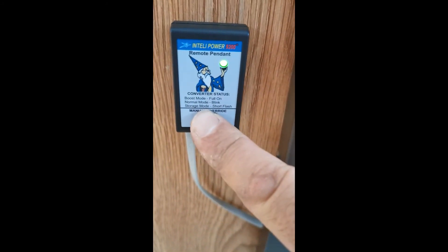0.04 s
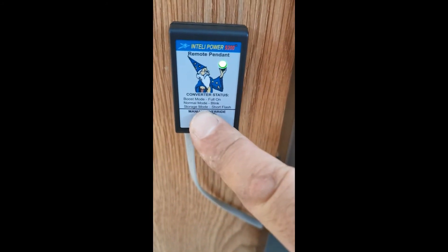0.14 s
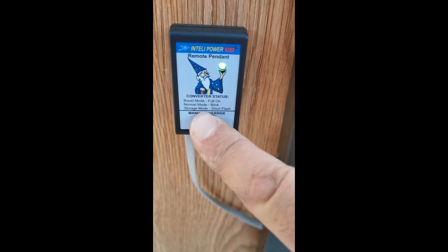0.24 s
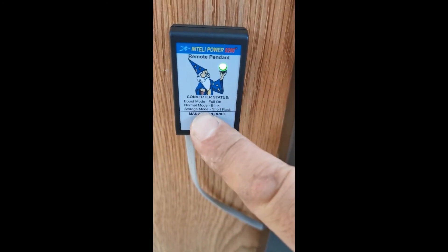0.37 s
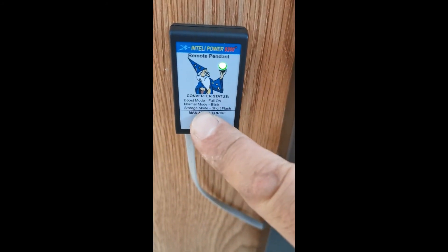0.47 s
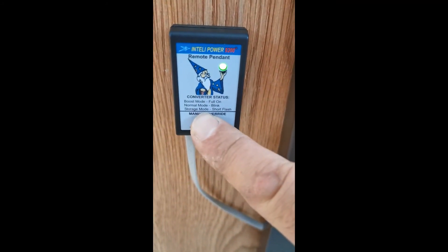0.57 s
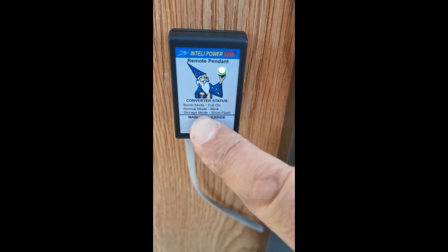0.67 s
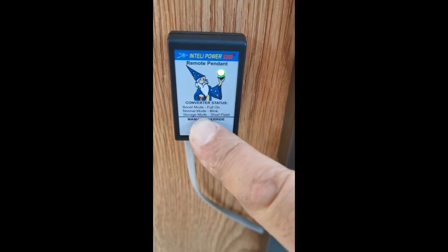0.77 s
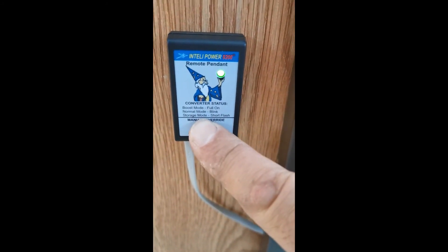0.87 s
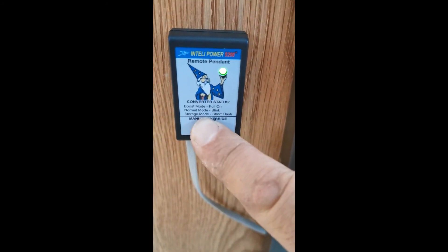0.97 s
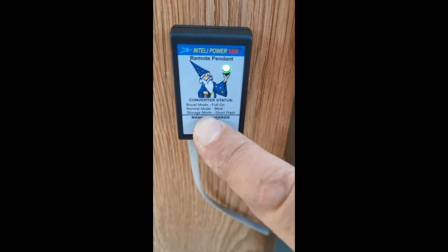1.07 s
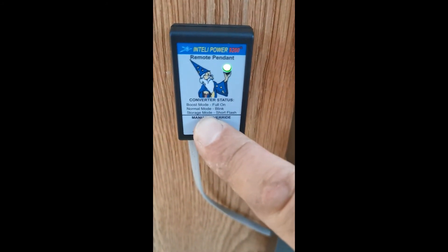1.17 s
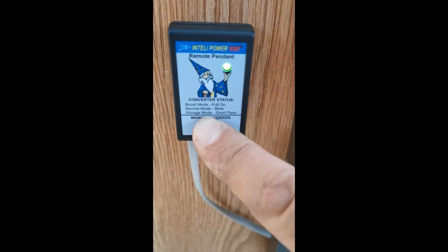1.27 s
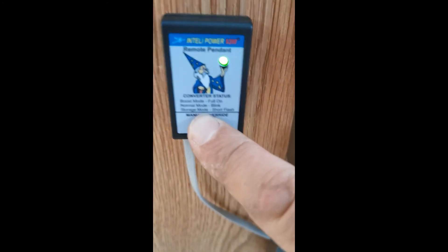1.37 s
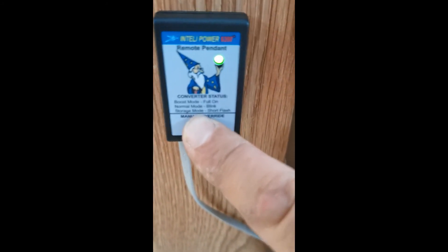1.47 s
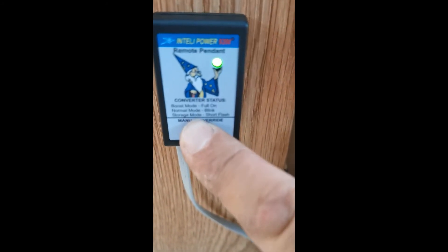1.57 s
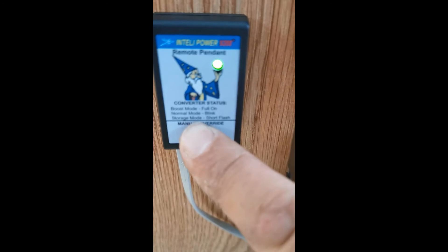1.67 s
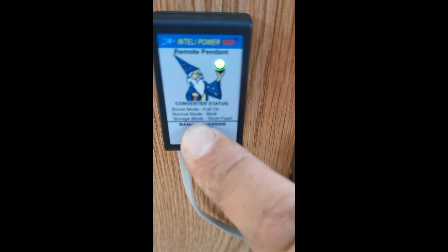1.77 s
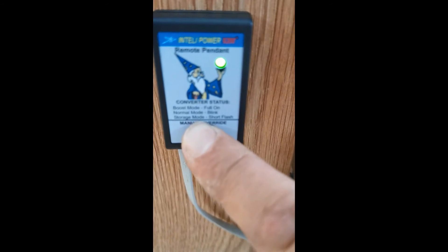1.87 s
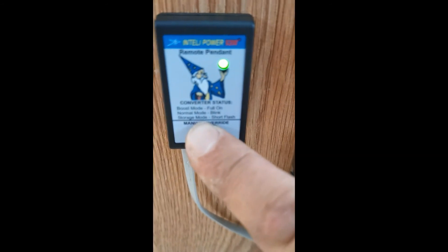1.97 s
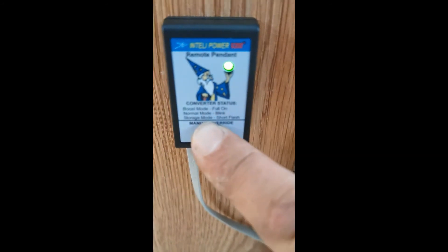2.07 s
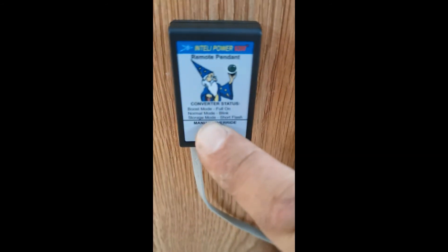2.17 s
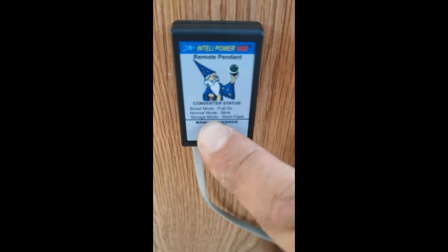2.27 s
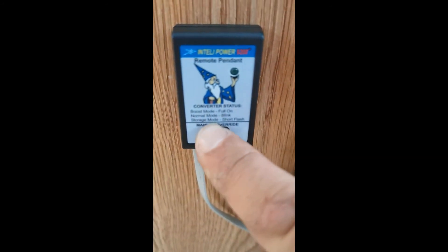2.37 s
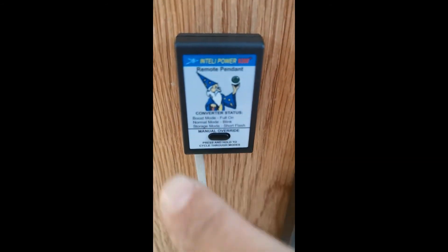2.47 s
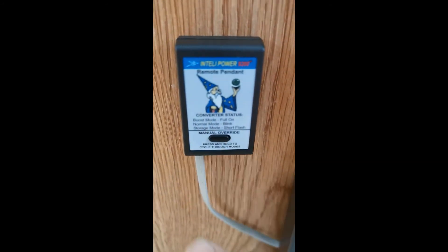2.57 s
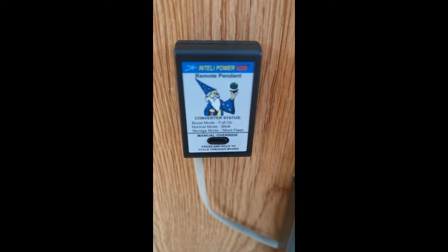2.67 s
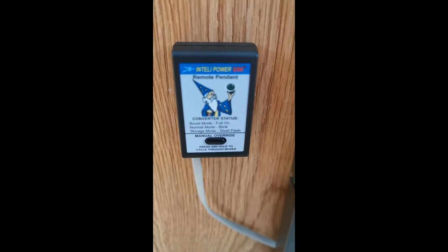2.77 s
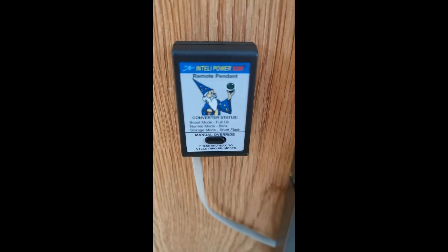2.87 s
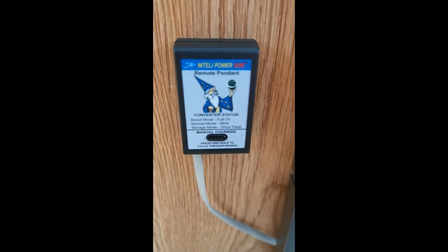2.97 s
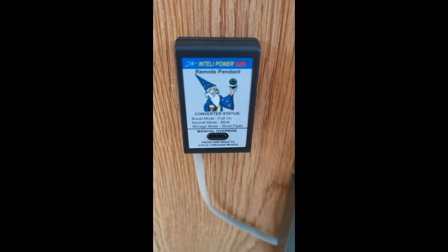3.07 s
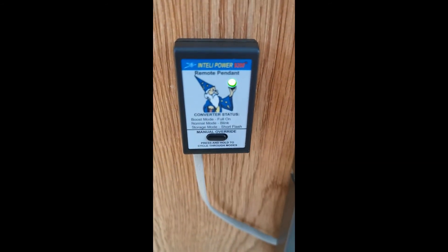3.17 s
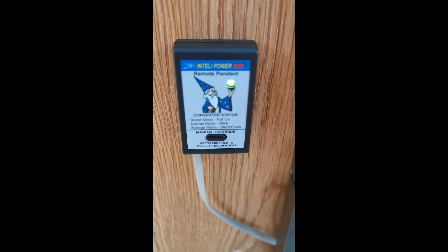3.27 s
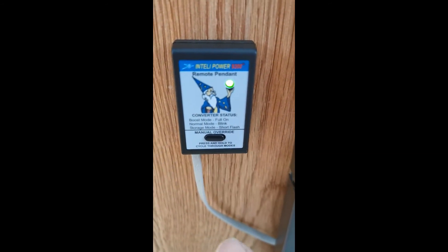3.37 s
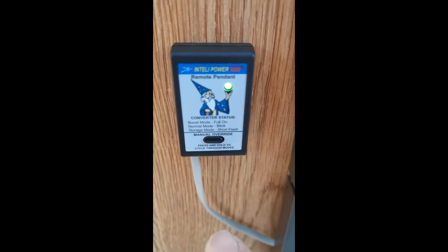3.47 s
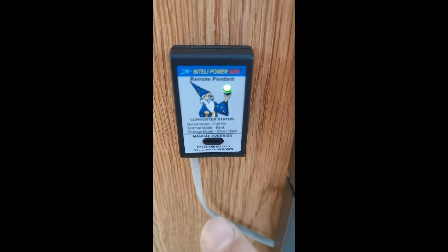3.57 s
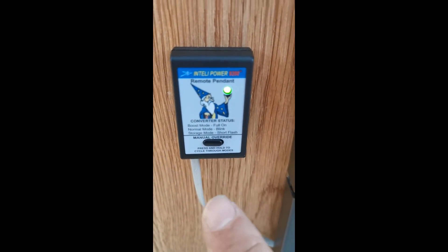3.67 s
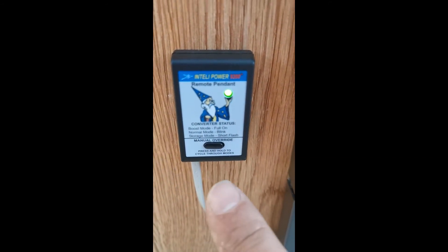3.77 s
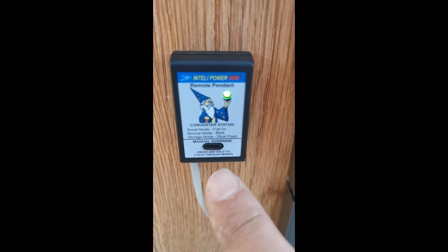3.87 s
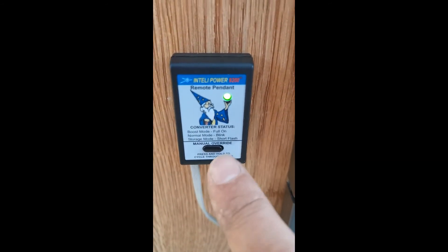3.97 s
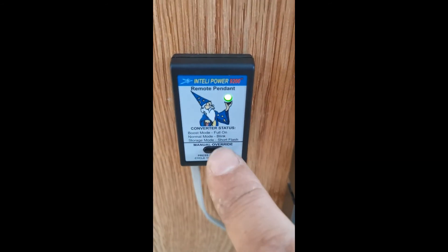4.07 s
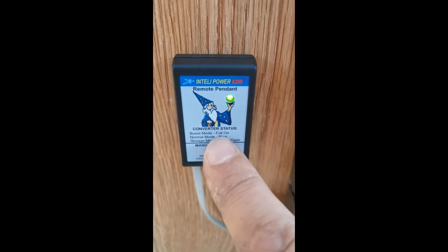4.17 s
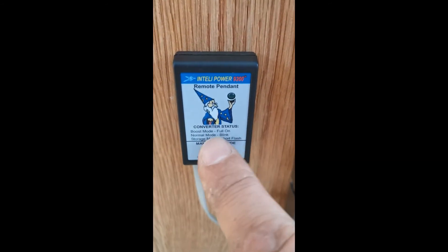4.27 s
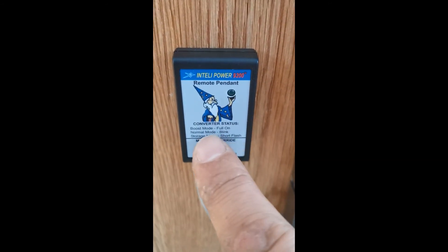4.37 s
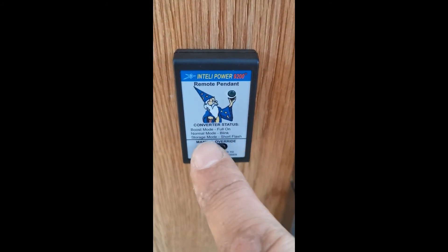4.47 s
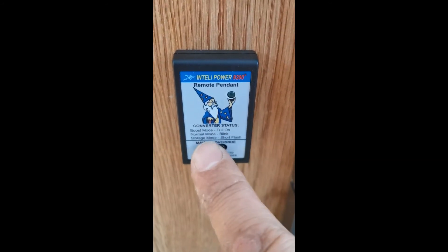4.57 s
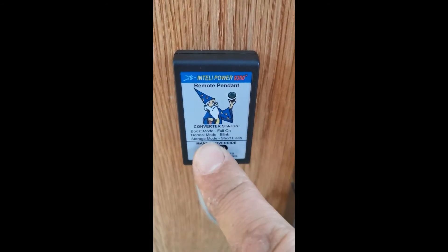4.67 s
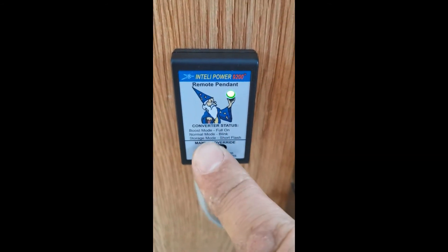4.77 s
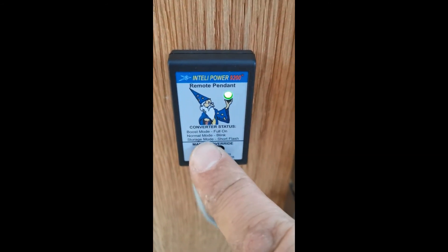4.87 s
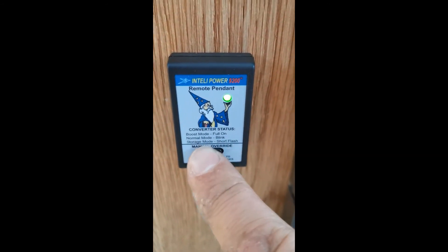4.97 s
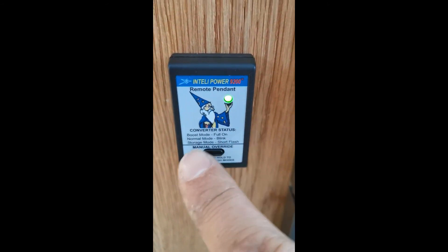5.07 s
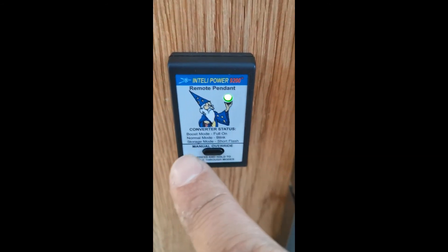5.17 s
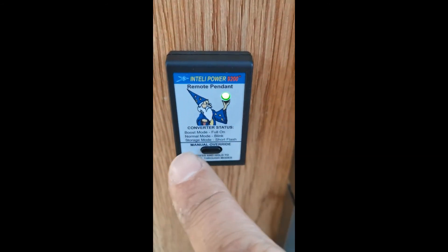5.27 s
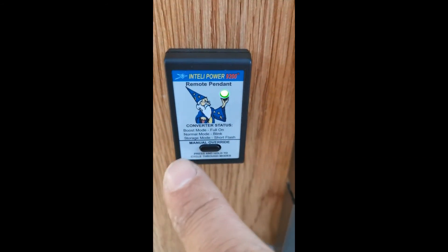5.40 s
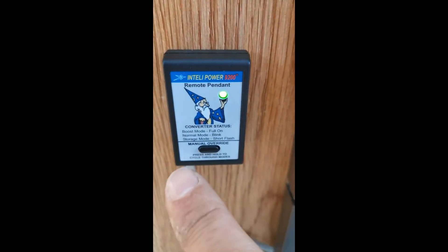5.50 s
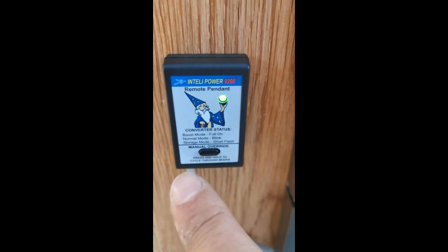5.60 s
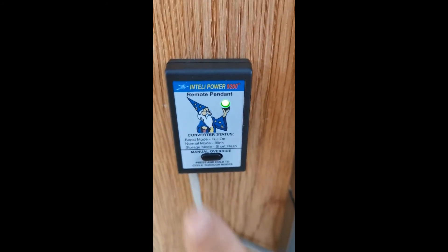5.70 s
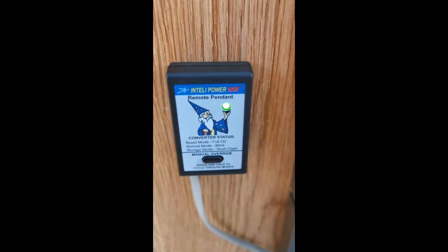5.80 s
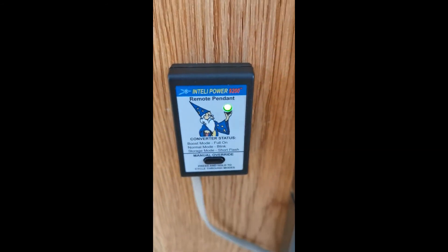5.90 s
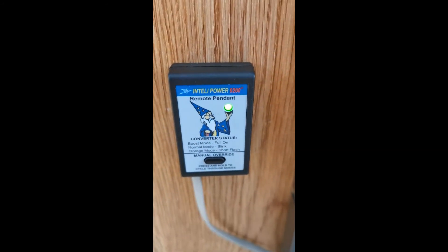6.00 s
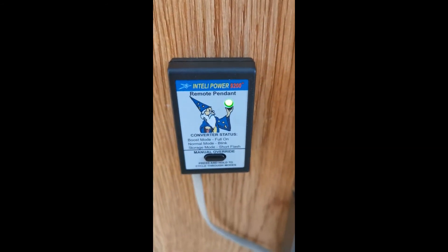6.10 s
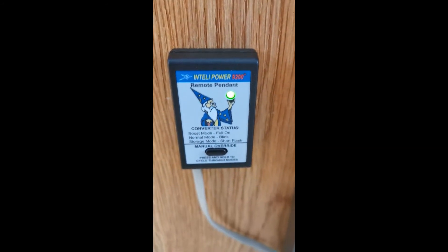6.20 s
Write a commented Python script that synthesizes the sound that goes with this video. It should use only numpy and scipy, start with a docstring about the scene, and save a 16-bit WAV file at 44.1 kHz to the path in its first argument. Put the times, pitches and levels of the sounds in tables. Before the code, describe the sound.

Close, dry stereo pickup in a small quiet room. Low airy rumble, faint hiss and an unsteady low hum run throughout, with barely audible insect chirps and trill. At about two and a half seconds a button releases with a crisp plastic snap and small ticks; later come a soft nail tap, a bright hard press click and another sharp snap as the finger slips off, then quiet.

```python
"""Push button on a wooden panel

A finger works the push button of a small plastic control box on a wooden wall panel, in a small quiet room.
Each snap is a noisy crack and the ringing modes of the case, over the thump of the panel and a short room
tail; the finger's lighter ticks are the same blow, softer and damped. Behind it lie shaped noise for air,
rumble, hiss and a low hum, with the faint chirps and pulsed trill of insects outside."""
import sys
import numpy as np
from scipy import signal
from scipy.fft import rfft, irfft
from scipy.io import wavfile

SR = 44100
rng = np.random.default_rng(int(sys.argv[2]) if len(sys.argv) > 2 else 0)


def unload_audio(sound):
    """Save the sound as a 16-bit wav file, at the path given as the first command line argument."""
    columns = np.transpose(np.atleast_2d(sound))
    # keep every value between -1 and 1, then stretch to whole-number steps
    steps = np.round(np.clip(columns, -1, 1) * 32767)
    wavfile.write(sys.argv[1], SR, steps.astype(np.int16))


N = 275266  # length [samples]

# Left-right pan is left minus right; the spectra of noises and modes are relative levels.
# room air spectrum: (frequency [Hz], level [dB per Hz])
AIR_SPECTRUM = [(12, -31), (20, 3.5), (38, -3.5), (58, -5.5), (75, -4), (90, -9.5), (135, -5.5),
                (156, -12.5), (205, -8), (253, -17), (484, -21), (752, -23.5), (927, -22.5), (1810, -42.5),
                (3000, -43), (3900, -68.5), (6600, -120)]
# hiss spectrum: (frequency [Hz], level [dB per Hz])
HISS_SPECTRUM = [(2200, -6.5), (3000, -6.5), (4000, -4), (5000, -1.5), (5800, -3), (6250, -9.5),
                 (9000, -14), (12000, -11.5), (15500, -15)]
# how alike the background is on both sides: (frequency [Hz], likeness [0 to 1])
SIDE_LIKENESS = [(30, 0.54), (80, 0.89), (150, 0.92), (380, 0.34), (950, 0.019), (15000, 0.1)]
# one more gentle swell of air and hiss: (middle [s], half length [s], lift [dB])
LATE_SWELL = (5.7, 0.51, 1.8)
# hands shifting, which lifts air and hiss, brushes softly and bumps the deep bass:
# (middle [s], half length [s], lift [dB], brush [dB], bump [dB])
HAND_MOVES = [(.3, 0.14, 1, -79, 2.5), (5.31, 0.081, 0, -90.5, 9)]
# bouts of evenly paced insect chirps: (first chirp [s], last chirp [s])
CHIRP_BOUTS = [(.33, 1.05), (1.485, 2.185), (2.58, 4.57), (5.205, 5.595), (6.115, 6.115)]
# room decay: (frequency [Hz], t60 [s])
ROOM_DECAY = [(150, 0.11), (600, 0.1328), (2000, 0.1245), (5000, 0.18), (8000, 0.1559), (15000, 0.24)]
# how strongly the room answers: (frequency [Hz], level [dB])
ROOM_TONE = [(150, -7), (350, 5), (700, 3.5), (2000, 1.5), (3200, 5.5), (5000, -3), (8000, -3.5),
             (15000, -11.5)]
# wooden panel with the box on it, broad knocks and longer rings, before any damping by the finger:
# (frequency [Hz], level [dB], t60 [s], left-right pan [dB], first swing [+1 or -1])
PANEL_MODES = [(201.9, -3, 0.15, -1, 1), (216.5, -11.5, 0.35, -1.5, 1), (284, -1, 0.022, 6, 1),
               (326, -13, 0.11, -5.5, 1), (343.3, -8, .11, 11.5, -1), (559, -19, 0.2, -6, -1),
               (570, 8.5, 0.0057, -9.5, -1), (600, -23, 0.19, -3.5, -1), (693, -17.5, 0.086, -5.5, 1),
               (772, -28, 0.1, -9, -1), (898, -25, 0.2, 9.5, -1), (1094, -15.5, 0.032, 0, -1),
               (1040, 5, 0.0041, 15.5, 1), (1065, -8, .04, -11, 1), (1327, -11, 0.026, -24, -1),
               (1580, -21, 0.058, 13, 1)]
# plastic case and switch dome:
# (frequency [Hz], level [dB], t60 [s], left-right pan [dB], first swing [+1 or -1])
CASE_MODES = [(2600, -9, .016, -2, 1), (3100, -6.5, .018, 0, -1), (3440, -6, .02, -2, 1),
              (4300, -1, .018, 4, -1), (4680, -1.5, .015, 4, 1), (5280, -.5, .015, 2, -1),
              (6500, -4, .012, -2, 1), (7050, -6, .012, -3, -1), (7650, -3, .013, -5, 1),
              (8200, -6, .012, -5, -1), (8700, -4, .012, -5, 1), (9450, -7, .01, -4, -1),
              (10900, -10, .009, -4, 1), (12900, -18, .008, -4, -1)]
# crack of contact: (frequency [Hz], level [dB])
CRACK_SPECTRUM = [(200, -13), (1000, -4), (2000, -1), (3200, -4), (4800, -1), (6000, -2.5), (8200, -7.5),
                  (11000, -11.5), (13500, -16.5), (16000, -22)]
# how each way of striking the plastic weights the snap: (frequency [Hz], level [dB])
# clean release of the button
RELEASE_WEIGHTS = [(1400, 2), (2000, -5), (2600, -2.5), (3500, -1.5), (4100, -2.5), (5000, -0.5),
                   (6000, -4), (7600, -3), (8500, -9.5), (9400, 0.5), (11500, 1), (15000, -7)]
# finger slipping off: (frequency [Hz], level [dB])
SLIP_WEIGHTS = [(1400, 7.5), (2200, -0.5), (3500, -3.5), (4400, 1.5), (5700, 0), (6500, 6), (7600, -7.5),
                (9200, 3.5), (11000, -6), (15000, -10)]
# press: (frequency [Hz], level [dB])
PRESS_WEIGHTS = [(1300, -0.5), (2100, -6), (3000, -1), (3600, -2.5), (4400, 0.5), (5200, -3.5),
                 (6200, -9.5), (7300, 5), (8700, 2.5), (9600, -9), (11000, -7), (12500, -8), (15500, -14.5)]
# fingernail: (frequency [Hz], level [dB])
NAIL_WEIGHTS = [(1300, 3), (2700, -4), (3600, -9), (4400, -2.5), (5000, 5.5), (6000, 9), (8500, 9.5),
                (11000, 14.5), (13000, 18), (15000, 10)]
# switch snaps and the tap of the finger landing:
# (time [s], snap [dB], thump [dB], treble tilt [dB/octave], way of striking [name],
#  panel damping by the finger [1/s, below 0 counts as 0], hardness [dB/octave], room [dB])
SWITCH_CLICKS = [(2.4767, -30, -24.5, -0.5, "release", 7.5, -2, -8.5),
                 (4.2347, -41, -49, -2, "nail", -1.5, -2.5, -3.5),
                 (4.6765, -27, -28.5, 2, "press", 33.5, -2, -11),
                 (5.0198, -30.5, -29, 6, "slip", 4.5, -2, -9.5)]
# light ticks of fingertip and loose button:
# (time [s], snap [dB], thump [dB], treble tilt [dB/octave])
LIGHT_TICKS = [(2.44, -87.5, -60.5, -9), (2.4977, -47.5, -56, -2), (2.506, -50, -42.5, -3),
               (2.546, -57, -73, 1.5), (2.5684, -66.5, -81, -1), (3.2650, -69.5, -86, 6),
               (4.2280, -63, -55.5, -12), (4.4403, -72, -55.5, 3), (4.4786, -56.5, -66, 4),
               (4.55, -67, -76, -0.5), (4.9789, -67.5, -73, 7.5), (5.0859, -48.5, -49, -5.5),
               (5.25, -68.5, -72.5, -13.5)]

AIR_DB, HISS_DB = -65, -82  # rms before settling and lifts
AIR_SETTLE_DB, HISS_SETTLE_DB, SETTLE_S = 5.5, 5, 0.51  # extra level at the start, and how fast it dies
RUMBLE_DB = 2.5  # lift of the deepest bass above the rest of the air
HUM_DB = -71.5  # resting level
HUM_SWELL_S, HUM_SWELL_HALF_S, HUM_SWELL_DB = 1.7, 1.3, 6.3
CHIRP_EVERY_S, CHIRP_DB = .38, -85.5
TRILL_DB, TRILL_FADE_DB_PER_S = -84, 2.5  # level at the start, then a steady fade
TRILL_RETURN_S, TRILL_RISE_DB_PER_S = 4, 2
LEFT_LATE_S = .00003  # the right side hears each blow first
EDGE_HZ = 15900


def amp(db):
    """Decibels to gain."""
    return 10 ** (np.asarray(db) / 20)


def evened(x):
    """Scales a sound to an overall rms of 1."""
    return x / np.sqrt(np.mean(x ** 2) + 1e-20)


def read(points, hz):
    """Reads a curve along a log-frequency axis."""
    f, value = np.transpose(points)
    return np.interp(np.log(hz + 1), np.log(f), value)


def add(mix, s, sound):
    """Mixes a stereo sound in at time s."""
    part = mix[:, round(s * SR):][:, :sound.shape[1]]
    part += sound[:, :part.shape[1]]


def swell(middle_s, half_s):
    """A flat-topped rise and fall from 0 to 1 and back."""
    t = np.arange(N) / SR
    return np.exp(-((t - middle_s) / half_s) ** 4)


def narrow_noise(hz, width_hz):
    """A fuzzy stereo tone: noise under a bell-shaped band, at an overall rms of 1."""
    f = np.fft.rfftfreq(N, 1 / SR)
    band = np.exp(-((f - hz) / width_hz) ** 2)
    return evened(irfft(rfft(rng.standard_normal((2, N))) * band, N))


def colour(x, db_at, size=32768):
    """Causal minimum-phase filter with the gain db_at(Hz), so that attacks stay sharp."""
    log_gain = np.log(amp(db_at(abs(np.fft.fftfreq(size, 1 / SR)))))
    response = np.exp(np.conj(signal.hilbert(log_gain)))[:size // 2 + 1]
    return irfft(rfft(x, size) * response)[:, :x.shape[1]]


def background():
    """Air, rumble and hiss as shaped noise, most alike on both sides around 80 to 150 Hz; it settles and lifts."""
    hz = np.fft.rfftfreq(N, 1 / SR)
    settling = np.exp(-np.arange(N) / SR / SETTLE_S)
    late_s, late_half_s, late_db = LATE_SWELL
    lift_db = late_db * swell(late_s, late_half_s)
    lift_db = lift_db + sum(db * swell(s, half_s) for s, half_s, db, _, _ in HAND_MOVES)
    bump_db = sum(db * swell(s, half_s) for s, half_s, _, _, db in HAND_MOVES)
    # the right side shares part of the left side's noise
    left, other = rfft(rng.standard_normal((2, N)))
    same = np.clip(read(SIDE_LIKENESS, hz), 0, 1)
    noise = np.array([left, same * left + np.sqrt(1 - same ** 2) * other])
    air = amp(AIR_DB) * evened(irfft(noise * amp(read(AIR_SPECTRUM, hz)), N))
    deep = signal.sosfiltfilt(signal.butter(2, 55, fs=SR, output="sos"), air)
    hiss = amp(HISS_DB) * evened(irfft(noise * amp(read(HISS_SPECTRUM, hz)), N))
    wash = (air - deep) * amp(AIR_SETTLE_DB * settling)
    wash += hiss * amp(HISS_SETTLE_DB * settling)
    return wash * amp(lift_db) + deep * amp(RUMBLE_DB + bump_db)


def hum():
    """A low, unsteady machine hum: one narrow noise band, alike on both sides, swelling once."""
    tone = narrow_noise(hz=87, width_hz=14)[0]
    return amp(HUM_DB + HUM_SWELL_DB * swell(HUM_SWELL_S, HUM_SWELL_HALF_S)) * tone


def trill(strokes_per_s=67.3, groups_per_s=10.6, top_hz=6020, fall_hz=520):
    """A far cricket: quick wing strokes in gently pulsing groups, each stroke falling in pitch."""
    t = np.arange(N) / SR
    # the stroke rate and the pitch both waver a little
    stroke = (strokes_per_s * t + 0.024 * narrow_noise(0, width_hz=5.0)[0]) % 1
    pitch_hz = top_hz - fall_hz * stroke + 110 * narrow_noise(0, width_hz=220)
    tone = np.sin(2 * np.pi * np.cumsum(pitch_hz, 1) / SR)
    groups = 1 + 0.15 * np.sin(2 * np.pi * groups_per_s * t)
    pulsing = np.sin(np.pi * stroke) ** 4 * groups
    fade_db = TRILL_FADE_DB_PER_S * np.minimum(t, TRILL_RETURN_S)
    rise_db = TRILL_RISE_DB_PER_S * np.maximum(t - TRILL_RETURN_S, 0)
    return amp(TRILL_DB - fade_db + rise_db) * evened(tone * pulsing)


def chirping(half_s=.05):
    """An insect's chirps: short soft swells of a thin high band, evenly spaced within each bout."""
    bouts = []
    for first, last in CHIRP_BOUTS:
        count = 1 + round(abs(last - first) / CHIRP_EVERY_S)
        bouts.append(np.linspace(first, last, count))
    swells = sum(swell(s, half_s) for s in np.concatenate(bouts))
    return amp(CHIRP_DB) * swells * narrow_noise(hz=7780, width_hz=310)


def rustle():
    """The soft brush of the moving hand: a mid noise band that swells with each shift."""
    brushes = sum(amp(db) * swell(s, half_s) for s, half_s, _, db, _ in HAND_MOVES)
    return brushes * narrow_noise(hz=1570, width_hz=680)


def room(x, first_s=0.0036, size=16384):
    """Dense reflections off near walls: random taps, each band dying at its own speed."""
    t = np.arange(size) / SR
    taps = rng.choice([-1., 1.], (2, size)) * (rng.random((2, size)) < 5000 / SR)  # about 5000 a second
    hz, at, bands = signal.stft(taps, SR, nperseg=256)
    decay = np.exp(-np.log(1000) * at / read(ROOM_DECAY, hz)[:, None])
    tail = signal.istft(bands * decay, SR, nperseg=256)[1][:, :size]
    tail *= np.clip(t / first_s - 1, 0, 1)  # silent until first_s, then fading in
    tail = colour(evened(tail) / np.sqrt(size), lambda f: read(ROOM_TONE, f))
    return signal.fftconvolve(x, tail, axes=1)[:, :x.shape[1]]


def ring(modes, t, tilt_db=0):
    """Dying sine modes, panned each to its side; a positive tilt [dB/octave] favours the high ones."""
    out = 0
    for hz, db, t60, pan, swing in modes:
        side_db = np.array([[pan], [-pan]]) / 2
        gain = np.sign(swing) * amp(db + tilt_db * np.log2(hz / modes[0][0]) + side_db)
        out = out + gain * np.exp(-np.log(1000) * t / t60) * np.sin(2 * np.pi * hz * t)
    return out


def by_attack(x, size=132):
    """Scales a blow to an rms of 1 over its first three milliseconds."""
    return x / np.sqrt(np.mean(x[:, :size] ** 2) + 1e-20)


def blow(snap_db, thump_db, tilt_db, way, damping, hard_db, room_db, size=20000):
    """One impact: a crack and the ring of the case over the thump of the panel, answered by the room."""
    t = np.maximum(np.arange(size) / SR - np.array([[LEFT_LATE_S], [0]]), 0)
    weights = {"release": RELEASE_WEIGHTS, "slip": SLIP_WEIGHTS,
               "press": PRESS_WEIGHTS, "nail": NAIL_WEIGHTS}[way]

    def weighting(f):
        """The way of striking, tilted above 1500 Hz."""
        return read(weights, f) + tilt_db * np.log2(np.maximum(f, 1500) / 1500)

    # the snap builds while the dome flips over
    case = by_attack(ring(CASE_MODES, t) * (1 - np.exp(-t / .0005)))
    burst = (1 - np.exp(-t / .0003)) * np.exp(-t / .0015)
    grit = rng.standard_normal(size) + 0.18 * rng.standard_normal((2, size))  # mostly alike on both sides
    crack = by_attack(colour(grit * burst, lambda f: read(CRACK_SPECTRUM, f)))
    snap = amp(snap_db) * by_attack(colour(case + crack / 2, weighting))
    # a low cut keeps deep bass out of the thump
    low_cut = signal.butter(4, 165, "highpass", fs=SR, output="sos")
    panel = ring(PANEL_MODES, t, hard_db) * np.exp(-max(damping, 0) * t)
    thump = amp(thump_db) * by_attack(signal.sosfilt(low_cut, panel))
    # the room hears the case from all sides, which evens out its narrow peaks
    impulse = np.tile(signal.unit_impulse(size), (2, 1))
    all_round = colour(impulse, lambda f: read(CRACK_SPECTRUM, f) + weighting(f))
    all_round = amp(snap_db) * by_attack(all_round)
    return snap + thump + amp(room_db) * room(all_round + thump)


def button():
    """The clicks of the switch and the light, damped ticks around them, each a separate impact."""
    out = np.zeros((2, N))
    for s, *how in SWITCH_CLICKS:
        add(out, s, blow(*how))
    for s, snap_db, thump_db, tilt_db in LIGHT_TICKS:
        add(out, s, blow(snap_db, thump_db, tilt_db, "release", damping=100, hard_db=-1, room_db=-6.0))
    return out


def scene():
    """The button in front of the quiet room."""
    return background() + hum() + trill() + chirping() + rustle() + button()


def record(dry):
    """Band limit: a steep linear-phase low-pass takes off the very top."""
    low_pass = signal.firwin(511, EDGE_HZ, window=("kaiser", 9), fs=SR)
    return signal.oaconvolve(dry, low_pass[None], "same")


dry = scene()
out = record(dry)
unload_audio(out)
```